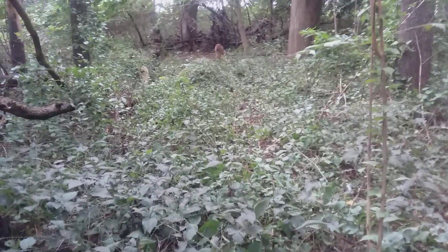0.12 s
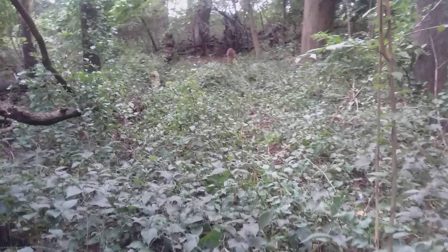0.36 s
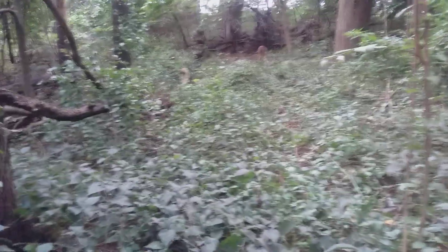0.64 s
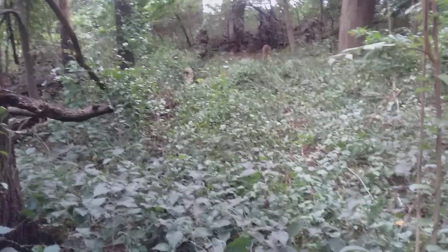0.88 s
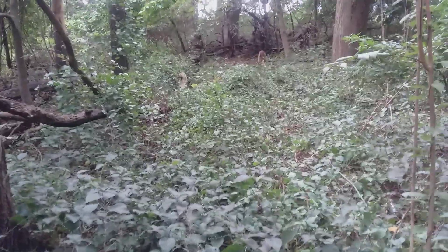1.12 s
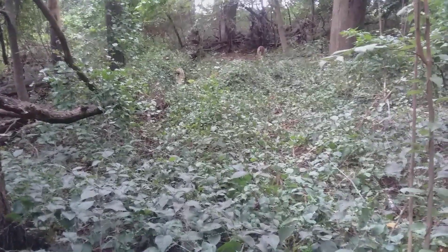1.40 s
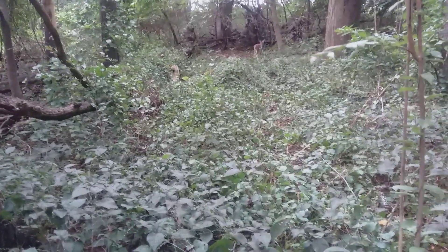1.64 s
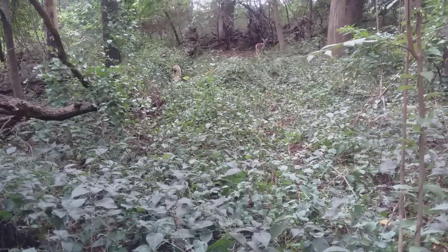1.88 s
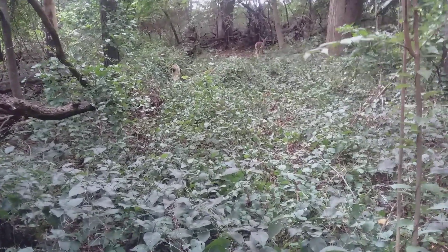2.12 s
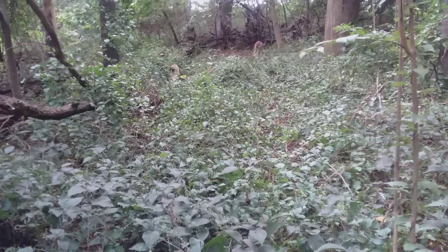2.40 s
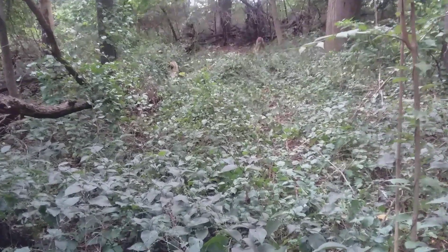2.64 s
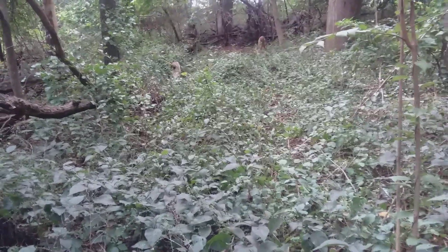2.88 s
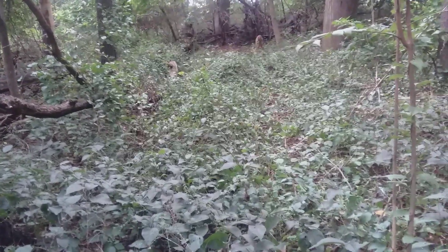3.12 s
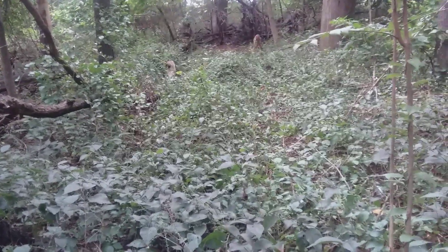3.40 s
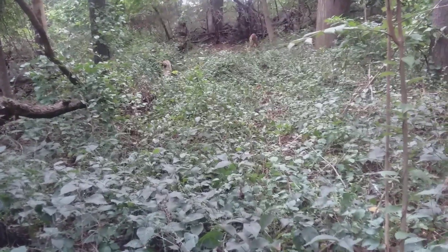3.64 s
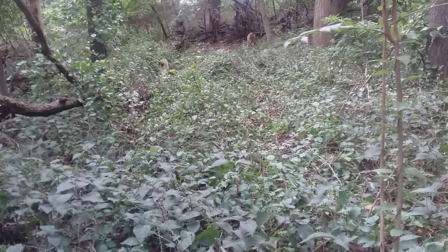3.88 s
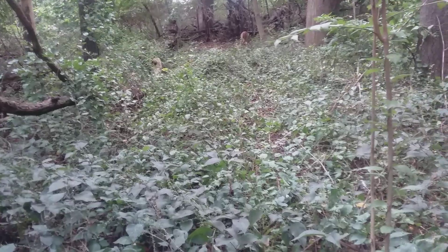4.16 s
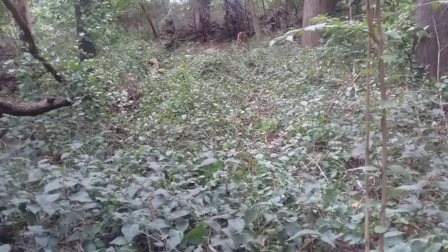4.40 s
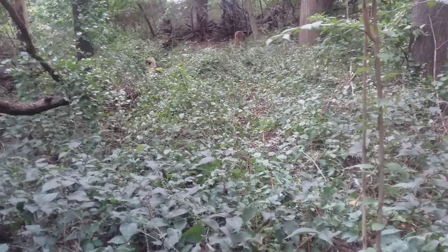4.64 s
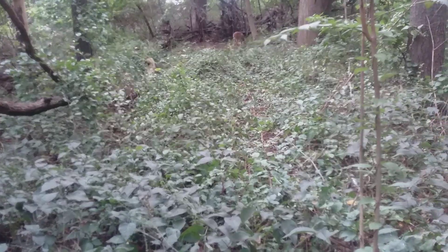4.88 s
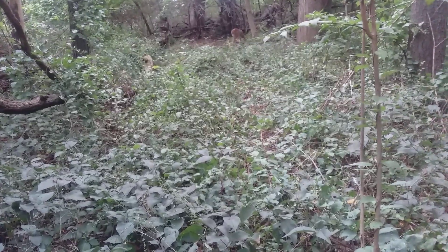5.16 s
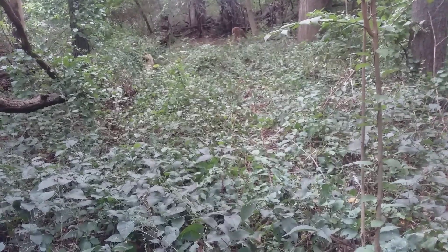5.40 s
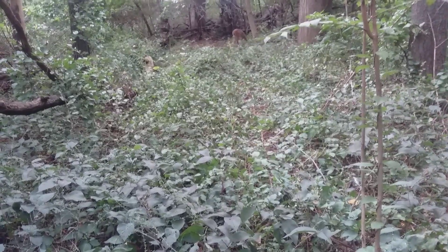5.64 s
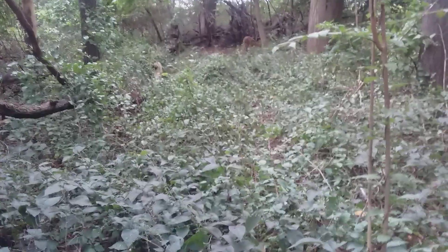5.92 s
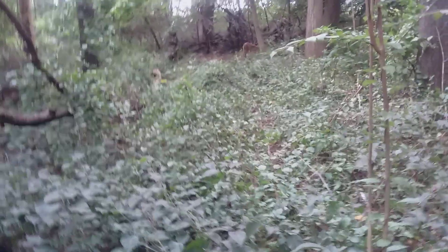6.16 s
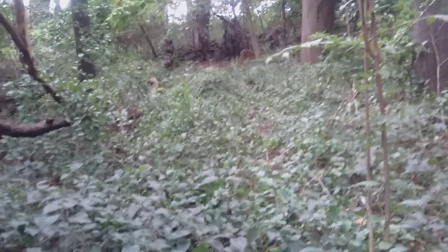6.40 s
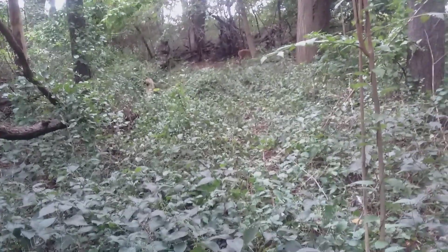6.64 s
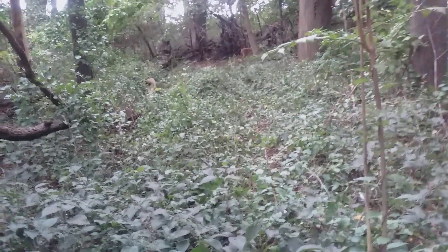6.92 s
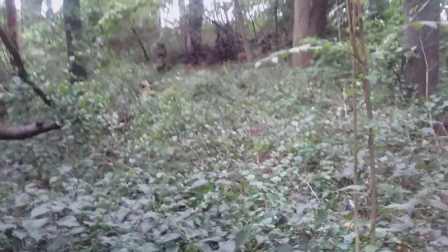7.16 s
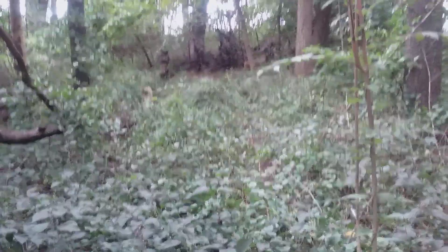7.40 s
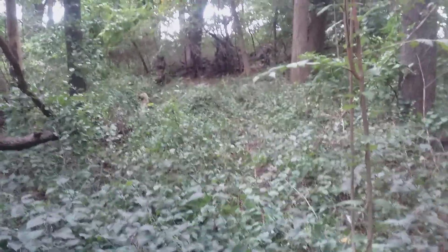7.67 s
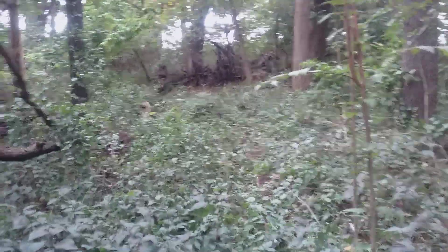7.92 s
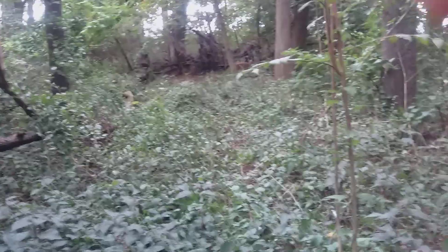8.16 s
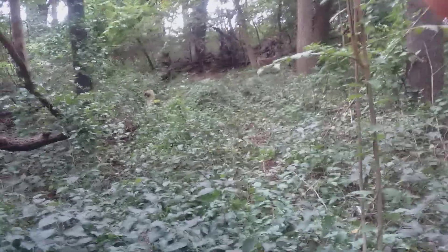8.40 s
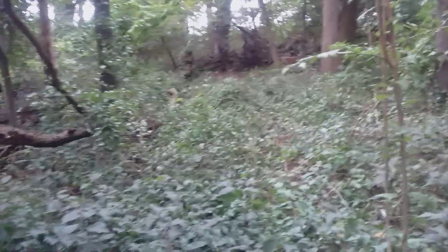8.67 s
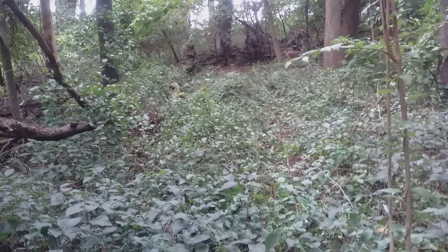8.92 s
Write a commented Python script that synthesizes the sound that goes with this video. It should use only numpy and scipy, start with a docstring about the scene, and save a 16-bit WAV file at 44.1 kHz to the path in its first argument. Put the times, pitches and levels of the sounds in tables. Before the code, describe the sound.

In leafy woodland, a dense chorus of crickets shimmers continuously, very high and pulsing, over soft distant traffic rumble. A handheld microphone picks up small ticks, taps and brief rubs. Just after six seconds a very loud knock thuds, the insects dull as a finger covers the microphone, then scratchy rubbing clears them again, followed by one sharp loud click near eight seconds.

```python
"""In a wood, crickets sing in a dense chorus, with fast trillers and one near chirper, over far traffic rumble.
A hand holds a small camera: fingers tick and rub on the case, knock it hard, cover the microphone and let go.
The insects are pulsed tones, the rubs and the background are mostly coloured noise, and blows on the case
are short ringing tones. A low hum and faint far calls lie behind."""
import sys
import numpy as np
from scipy import signal
from scipy.fft import rfft, irfft
from scipy.io import wavfile

SR = 44100
rng = np.random.default_rng(int(sys.argv[2]) if len(sys.argv) > 2 else 0)


def wav_out(sig):
    """Save sig, one row per channel (or a flat mono array), as 16-bit PCM at SR to the path in sys.argv[1]."""
    wavfile.write(sys.argv[1], SR, np.round(np.clip(np.atleast_2d(sig).T, -1, 1) * 32767).astype(np.int16))


def to_linear_factor(level_db):
    """Convert decibel levels (scalar or array-like) to linear amplitude factors."""
    exponent = np.asarray(level_db, float) / 20
    return 10 ** exponent


N = 398663  # length [samples]
T = np.arange(N) / SR  # time [s]


def curves(tables, rest_db=None):
    """Join table columns by straight lines; with rest_db each table drops to that level outside its span."""
    rows = []
    for table in tables:
        if rest_db is None:
            rows += list(table)
        else:
            quiet = [rest_db] * (len(table[0]) - 1)
            rows += [(table[0][0] - 0.003, *quiet), *table, (table[-1][0] + 0.004, *quiet)]
    times, *columns = np.transpose(rows)
    return [np.interp(T, times, column) for column in columns]


def unit(x):
    """Scale to an rms of 1."""
    return x / np.sqrt(np.mean(x ** 2))


def noise(points, band_hz=(0, SR)):
    """Noise coloured by (frequency [Hz], level [dB]) points, with rms 1 inside band_hz."""
    hz, db = np.transpose(points)
    f = np.arange(1, N // 2 + 2) * SR / N
    gain = to_linear_factor(np.interp(np.log(f), np.log(hz), db, -99, -99))
    in_band = (f > band_hz[0]) & (f < band_hz[1])
    share = np.sum(gain[in_band] ** 2) / np.sum(gain ** 2)
    coloured = irfft(rfft(rng.standard_normal(N)) * gain, N)
    return unit(coloured) / np.sqrt(share)


def walk(rate):
    """Random levels, rate of them a second, joined by smooth steps; their spread is near 1."""
    place = T * rate
    k = place.astype(int)
    level = 1.15 * rng.standard_normal(k[-1] + 2)
    part = place - k
    return level[k] + np.diff(level)[k] * part * part * (3 - 2 * part)


def tone(hz):
    """Phase of a tone whose pitch may move."""
    return 2 * np.pi * np.cumsum(hz * np.ones(N)) / SR


def from_stroke(cycles):
    """Place within each wing cycle, from -0.5 to 0.5, with 0 at the middle of the stroke."""
    return (cycles + 0.5) % 1 - 0.5


def strokes(cycles, share):
    """Loudness of one smooth wing stroke a cycle, filling this share of it."""
    return np.cos(np.pi * np.clip(from_stroke(cycles) / share, -0.5, 0.5))


def with_octave(phase, octave_db):
    """A wing tone and its octave."""
    return np.sin(phase) + to_linear_factor(octave_db) * np.sin(2 * phase)


def leaves(x, t60=0.39567, wet_db=-5):
    """Trunks and leaves scatter the song into a short smear that fades by 60 dB in t60 [s]."""
    t = T[:int(t60 * SR)]
    tail = rng.standard_normal(len(t)) * to_linear_factor(-60 * t / t60)
    tail = tail / np.sqrt(np.sum(tail ** 2))
    return unit(x + to_linear_factor(wet_db) * signal.fftconvolve(x, tail)[:N])


def crickets(voices, octave_db, count, scatter=0.02):
    """Several singers a voice, each with its own pitch and beat; the pitch sags through each stroke."""
    out = 0
    for hz, spread_hz, db, rate, share in voices:
        chances = rng.standard_normal((count, 2))
        for pitch, (tempo, start) in zip(np.linspace(-1.3, 1.3, count), chances):
            cycles = rate * (1 + scatter * tempo) * T + 3 * start
            sagging_hz = hz * (1 - 0.028 * from_stroke(cycles))
            phase = tone(sagging_hz + spread_hz * (pitch + 1.3 * walk(90)))
            loudness = to_linear_factor(db + 1.5 * walk(3)) * strokes(cycles, share)
            out = out + loudness * with_octave(phase, octave_db)
    return out


# The near cricket's count: (time [s], chirps sung so far [count])
CHIRP_COUNT = [(0, .42), (4.5, 60.24), (7.7, 102.99), (9.04, 120.85)]
# Its main tone and split octave: (pitch [Hz], relative level [dB])
CHIRP_TONES = [(6650, 2.5), (13250, 2), (13730, -2.5)]
# How they stand out of the chorus: (time [s], main level [dB], octave level [dB])
CHIRP_LEVELS = [(0, -5, -22), (4.3, -4.5, -21), (7.5, -4, -24), (8.3, 5, -22), (8.75, 4.5, -22),
                (9.04, -3.5, -22)]


def near_cricket():
    """Short chirps on a steady beat, each a little different, the pitch sagging through the stroke."""
    cycles, = curves([CHIRP_COUNT])
    main_db, octave_db = curves([CHIRP_LEVELS])
    bend = (1 - 0.03 * from_stroke(cycles)) * (1 + 0.006 * walk(14))
    tones = []
    for hz, db in CHIRP_TONES:
        phase = tone(hz * bend * (1 + 0.0045 * walk(3.5)))
        tones.append(to_linear_factor(db + 2.2 * walk(17)) * np.sin(phase))
    main, *octave = tones
    return (to_linear_factor(main_db) * main + to_linear_factor(octave_db) * sum(octave)) * strokes(cycles, 0.36)


# Thin steady tones: (pitch [Hz], level next to the chorus [dB])
WHINE_TONES = [(14000, -29.5), (15000, -48.5)]


def whine():
    """Very high, thin, steady sine tones."""
    return sum(np.sqrt(2) * to_linear_factor(db) * np.sin(tone(hz)) for hz, db in WHINE_TONES)


# (wing pitch [Hz], pitch spread scale [Hz], relative level [dB], pulses [per s], share of the cycle sung [0-1])
CHORUS_VOICES = [(6260, 20, -9, 45, 0.28), (6516, 77, -6, 27, 0.4), (6713, 80, 0.5, 13.4, 0.3),
                 (6870, 90, -3.5, 28, 0.64), (7200, 100, -8.5, 55, 0.25), (7370, 88, -14.5, 60, 0.54),
                 (7800, 15, -22.5, 84, .7), (3470, 110, -28, 30, 0.55), (10830, 70, -37, 60, .6)]


def chorus():
    """Dense wing song smeared by the wood, with the near cricket and the whine in it."""
    crowd = leaves(crickets(CHORUS_VOICES, octave_db=-34.5, count=5))
    return to_linear_factor(-51.5) * unit(crowd + near_cricket() + whine())


# (wing pitch [Hz], pitch spread scale [Hz], relative level [dB], pulses [per s], share of the cycle sung [0-1])
TRILL_VOICES = [(5480, 35, -3.5, 88, .45), (5578.1, 73, -4, 47, 0.61), (5900, 110, -6, 81, 0.57)]
# (time [s], level [dB])
TRILL_LEVEL = [(0, -67), (1.8, -71), (6.2, -69.5), (7.3, -63), (7.9, -62.5), (9.04, -66)]


def trillers():
    """Fast wing pulses in three voices; singers within a voice beat at nearly the same rate."""
    song = leaves(crickets(TRILL_VOICES, octave_db=-15, count=3, scatter=0.0037))
    return to_linear_factor(curves([TRILL_LEVEL])[0]) * song


# One close triller: (time [s], level [dB])
NEAR_TRILL_LEVEL = [(0, -84.5), (3, -77), (6.3, -76.5), (6.8, -83), (7.2, -76.5), (7.5, -61.5), (7.9, -63),
                    (8.5, -67), (9.04, -67.5)]


def near_triller():
    """Fast even pulses, each sweeping down through the wing's range, slightly smeared."""
    hz, pulses_per_s, sweep = 5350, 97, 0.25  # sweep: part of the pitch lost over a whole cycle
    cycles = pulses_per_s * T + 0.3 * walk(2.3)
    phase = tone(hz * (1 - sweep * from_stroke(cycles) + 0.015 * walk(30)))
    song = strokes(cycles, 0.46) * to_linear_factor(2.5 * walk(40)) * with_octave(phase, octave_db=-15)
    return to_linear_factor(curves([NEAR_TRILL_LEVEL])[0]) * leaves(song, t60=0.1, wet_db=-7.5)


def friction(rubs, swell):
    """Two loudness curves: each rub swells to its peak (shaped by a power), then fades; powers add."""
    power = np.zeros((2, N))
    for s, swell_s, fade_s, *db in rubs:
        on = slice(max(int((s - swell_s) * SR), 0), int((s + 3 * fade_s) * SR))
        rise = np.clip(1 + (T[on] - s) / swell_s, 0, 1) ** swell
        fall = to_linear_factor(-22 * np.clip(T[on] - s, 0, 1) / fade_s)  # 22 dB lost in each fade time
        power[:, on] += np.outer(to_linear_factor(np.array(db)), rise * fall) ** 2
    return np.sqrt(power)


# Bright slides of skin: (peak time [s], swell [s], fade [s], hiss level [dB], sizzle level [dB])
SLIDE_RUBS = [(.086, 0.02758, 0.1393, -60.5, -70), (1.146, .025, 0.2018, -59, -64.5),
              (1.31, 0.0194, 0.25, -68.5, -74), (1.53, 0.01044, .12, -67.5, -69),
              (2.578, .02, .12, -74, -74.5), (3.88, 0.05453, 0.138, -65.5, -67.5),
              (6.13, .006, .13, -66, -63), (6.3, .004, 0.097, -53.5, -50), (6.447, 0.014, 0.0907, -62, -63),
              (6.628, 0.087, .15, -67, -62), (7.0, .15, .3, -59, -57), (7.092, 0.086, 0.014, -56, -53),
              (7.11, 0.0039, 0.073, -78, -73), (7.321, .12, 0.0665, -66, -67),
              (7.43, 0.1, .012, -57.5, -55.5), (7.45, .005, 0.1263, -63, -61),
              (7.523, .005, 0.01, -50, -58), (7.535, .003, 0.036, -64, -65),
              (7.631, 0.0472, .3, -57.5, -59), (7.811, 0.14, 0.1898, -54, -53),
              (8.164, .002, .2, -67.5, -65), (8.444, .01, .09, -73, -79)]
# Dull catches and drags: (peak time [s], swell [s], fade [s], drag level [dB], scuff level [dB])
DRAG_RUBS = [(.06, 0.04, 0.1506, -66, -73), (1.146, 0.052, 0.241, -66.5, -71),
             (1.31, .025, 0.1312, -69, -84), (3.87, 0.0681, 0.14, -59.5, -68),
             (6.31, 0.0096, 0.19, -59, -68.5), (6.42, .02, .05, -71, -84), (7.09, 0.081, 0.0215, -90, -70),
             (7.405, 0.068, 0.061, -54.5, -51), (7.43, .03, 0.0087, -54, -51),
             (7.448, 0.00376, 0.12, -55.5, -60.5), (7.52, 0.0026, 0.12, -53.5, -70),
             (7.631, 0.1048, 0.1279, -59, -68.5), (7.811, 0.10173, .1, -55.5, -65),
             (8.165, .002, .15, -64, -64.5)]
# Colours of the four rubbing sounds: (frequency [Hz], relative level per Hz [dB])
HISS_COLOUR = [(3800, -36.5), (5000, -7.5), (8500, -1.5), (10500, -2.5), (12500, -18.5)]
SIZZLE_COLOUR = [(9500, -25), (11500, -0.5), (13000, -1), (16000, -7)]
DRAG_COLOUR = [(120, -31.5), (250, 2.5), (700, -2), (2200, -6), (3000, -31.5)]
SCUFF_COLOUR = [(1500, -29.5), (2800, -7.5), (4500, -2.5), (7000, 0.5), (9000, -25)]


def rubbing():
    """Skin hisses, scuffs and drags on the case: bands of noise broken into uneven grains."""
    hiss, sizzle = friction(SLIDE_RUBS, swell=0.4)
    drag, scuff = friction(DRAG_RUBS, swell=1.3)
    rub = hiss * noise(HISS_COLOUR, (8200, 11000)) + sizzle * noise(SIZZLE_COLOUR, (11500, 15500))
    rub = rub + drag * noise(DRAG_COLOUR, (300, 2400)) + scuff * noise(SCUFF_COLOUR, (2500, 4700))
    return rub * to_linear_factor(2.2 * walk(400))


# The hard knock: (time [s], scrape level [dB], body level [dB])
KNOCK_LEVELS = [(6.236, -63, -66), (6.255, -27.5, -28), (6.262, -25, -18), (6.268, -35.5, -17.5),
                (6.2695, -34.5, -8.5), (6.281, -40, -9), (6.285, -36.5, -26), (6.293, -48, -44),
                (6.42, -85.5, -78.5)]
# Colours of its scrape and body: (frequency [Hz], relative level per Hz [dB])
SCRAPE_COLOUR = [(1470, -35), (2500, -5.5), (4310, -1.5), (4910, -10), (6110, 4.5), (9150, -13),
                 (11900, -12), (16000, -12.5)]
BODY_COLOUR = [(59, -31.5), (100, -4), (724, -2), (1060, -6.5), (1400, -3), (1880, -14.5), (2180, -7.5),
               (3440, -19.5), (4700, -23), (8000, -48.5), (10400, -76), (17600, -120)]


def knock():
    """One knock shakes the whole body: a rough scrape and a deeper burst of noise."""
    scrape_db, body_db = curves([KNOCK_LEVELS], -110)
    scrape = to_linear_factor(scrape_db + 4.4 * walk(400)) * noise(SCRAPE_COLOUR)
    return scrape + to_linear_factor(body_db) * noise(BODY_COLOUR)


def thud():
    """The case swings on after the knock, fading and slowing."""
    start_s, hz, start_db, t60_s = 6.2835, 95.5, -19, 0.1274
    fall = 14  # pitch is divided by 1 + fall * time
    t = np.clip(T - start_s, 0, None)
    return to_linear_factor(start_db - 60 * t / t60_s) * np.sin(2 * np.pi * hz * np.log1p(fall * t) / fall)


def add(out, s, blow):
    """Mix a blow in at s [s]."""
    start = int(s * SR)
    out[start:start + len(blow)] += blow


def ring(modes, chances, rise_s):
    """One blow on a set of ringing tones, varied by chance; the contact takes rise_s [s]; peak 1."""
    t = T[:4096]
    y = 0
    for (hz, db, t60), chance in zip(modes, chances):
        loudness = to_linear_factor(db + 2 * chance - 60 * t / t60)
        y = y + loudness * np.sin(2 * np.pi * hz * (1 + 0.044 * chance) * t + chance)
    y = y * np.sin(np.pi / 2 * np.clip(t / rise_s, 0, 1)) ** 4
    return y / np.abs(y).max()


# Ticks of the case: (time [s], peak level [dB])
CASE_TICKS = [(0.0877, -47), (0.614, -47), (0.7944, -59), (0.82, -43), (1.0243, -53), (1.1474, -45),
              (6.1315, -54), (6.2874, -24), (6.4384, -53.5), (6.556, -46), (7.5183, -36), (7.5877, -46),
              (7.7064, -49.5), (7.7303, -50), (8.1614, -9), (8.3513, -35), (8.675, -40), (8.7934, -48.5)]
# Ringing of the plastic: (pitch [Hz], relative level [dB], time to fade 60 dB [s])
PLASTIC_MODES = [(2312, -24, .003), (3610, -16, 0.0029), (4300, -18, 0.0015), (5004, -13.5, .0025),
                 (6400, -8.5, .0025), (7900, -8.5, 0.0025), (9100, -2.5, 0.0023), (11100, -3, .002),
                 (12600, 2.5, 0.0017), (14000, -4.5, 0.0017), (15300, 2, 0.0019)]


def ticks():
    """Bright snaps of the plastic, each a quick blow on its many high ringing tones."""
    out = np.zeros(N + 4096)
    for s, db in CASE_TICKS:
        chances = rng.standard_normal(len(PLASTIC_MODES))
        add(out, s, to_linear_factor(db) * ring(PLASTIC_MODES, chances, 0.0012))
    return out[:N]


# Dull taps on the case, and two heavy blows of the hard knock: (time [s], peak level [dB], pitch [Hz])
CASE_TAPS = [(.055, -51.5, 1200), (.885, -51, 1090), (1.295, -46.5, 1510), (1.605, -50, 900),
             (1.98, -51, 600), (2.002, -43.5, 567), (3.861, -41.5, 600), (3.877, -46, 600),
             (3.907, -50, 4800), (3.944, -41, 720), (4.759, -51, 2013), (5.057, -52, 2000),
             (5.429, -54.5, 1880), (5.75, -52, 760), (6.269, -6, 630.1), (6.2775, -5, 327.6),
             (7.519, -44, 1003), (7.519, -40.5, 110), (7.531, -36, 900), (7.588, -43, 1390),
             (7.706, -39.5, 140), (7.73, -38, 147.9), (7.785, -52, 900)]
# Ringing of a tap or blow: (multiple of its pitch [ratio], relative level [dB], time to fade 60 dB [cycles])
DULL_MODES = [(.6, -3.5, 2.9), (1, -1, 6.5), (1.5, -7.5, 6.4), (2.3, -9.5, 6.5)]


def taps():
    """Dull taps on the case, and two heavy blows of the hard knock, each ringing around its own pitch."""
    out = np.zeros(N + 4096)
    for s, db, hz in CASE_TAPS:
        modes = [(k * hz, mode_db, cycles / (k * hz)) for k, mode_db, cycles in DULL_MODES]
        chances = rng.standard_normal(len(DULL_MODES))
        add(out, s, to_linear_factor(db) * ring(modes, chances, 0.42 / hz))
    return out[:N]


# The case sticks and lets go: (time [s], peak level [dB], length scale [s])
CASE_SNAPS = [(1.192, -49, 0.00051), (1.299, -46, 0.00049), (6.2634, -8, 0.0002), (7.4025, -31, 0.0002),
              (7.4105, -35, 0.00033), (7.4450, -27, 0.00011), (7.518, -35, 0.00025),
              (7.5344, -32, 0.0001604), (8.162, -38, 0.00046), (8.676, -46, .0004)]


def snaps():
    """The case lets go in one short inward push and a weaker rebound."""
    out = np.zeros(N)
    for s, db, length_s in CASE_SNAPS:
        u = T[:256] / length_s - 2
        push = -np.exp(-(2 * u) ** 2)
        rebound = 0.45 * np.exp(-(u - 1.6) ** 2)
        add(out, s - 2 * length_s, to_linear_factor(db) * (push + rebound))
    return out


def hand():
    """All that the hand does to the case: friction noise, a knock and ringing blows."""
    return rubbing() + knock() + thud() + ticks() + taps() + snaps()


# A finger closes over the microphone and lifts off: (time [s], level change [dB])
COVER_LEVEL = [(0, 0.5), (6.28, 0.5), (6.45, -4), (6.61, -7), (6.8, -11.5), (7.33, -15), (7.46, -1.5),
               (9.04, -0.5)]


def cover(share=1):
    """Gain left by the covering finger; share is the part of the level change that a sound takes."""
    return to_linear_factor(share * curves([COVER_LEVEL])[0])


# The level of the low engine hum, rising and dipping unevenly: (time [s], level [dB])
HUM_LEVEL = [(0, -51), (.86, -49.5), (1.88, -42), (2.3, -61.5), (2.45, -47.5), (3.4, -48), (4.11, -50),
             (5.1, -46), (5.55, -42.5), (5.9, -48), (7.65, -54), (8.0, -48), (9.04, -47)]


def engine_hum():
    """The hum of far engines: a wavering low tone, a rough band of noise round it and a faint higher drone."""
    hz, width_hz, rough = 72.416, 14.052, 0.27
    band = noise([(hz - width_hz, -14), (hz, 0), (hz + width_hz, -14)])
    smooth = np.sqrt(2) * np.sin(tone(hz + 2.3 * walk(8.1)))
    hum = unit((1 - rough) * smooth + rough * band)
    drone = to_linear_factor(-32 + 4 * walk(4)) * np.sin(tone(262 + 4 * walk(8)))
    return to_linear_factor(curves([HUM_LEVEL])[0] + 2.5 * walk(11)) * (hum + drone)


# (frequency [Hz], relative level per Hz [dB])
RUMBLE_COLOUR = [(25, -33), (40, -13.5), (55, -1), (70, 0.5), (95, 0), (125, -1.5), (170, -9.5),
                 (220, -21.5), (320, -28.5), (420, -60)]


def traffic_rumble():
    """Far traffic as steady, deep noise."""
    return to_linear_factor(-55) * noise(RUMBLE_COLOUR, (95, 200))


# Two faint far calls, each a list of (time [s], pitch [Hz], level [dB])
FAR_CALLS = [
    [(2.6, 611, -77), (2.7, 619, -60), (2.8, 583, -71.5)],
    [(8.78, 3350, -81.5), (8.82, 3300, -76), (8.92, 3125, -78), (9.0, 3041, -76), (9.04, 3020, -67)],
]


def far_calls():
    """Soft whistles, hoarse because pitch and level shake quickly."""
    hz, = curves([[row[:2] for call in FAR_CALLS for row in call]])
    db, = curves([[row[::2] for row in call] for call in FAR_CALLS], -120)
    return to_linear_factor(db + 4 * walk(60)) * np.sin(tone(hz + 70 * walk(130)))


# (frequency [Hz], relative level per Hz [dB])
AIR_COLOUR = [(120, -29), (200, -4.5), (400, -12), (700, -13.5), (1000, -17.5), (2850, -27.5), (4500, -30),
              (9000, -27), (12000, -30.5), (16000, -34.5)]


def air():
    """The soft wash of the open air: noise whose level wavers slightly."""
    return to_linear_factor(-68.5 + 0.48 * walk(9)) * noise(AIR_COLOUR, (300, 2800))


# (frequency [Hz], relative level per Hz [dB])
CIRCUIT_COLOUR = [(1500, -10.5), (4000, -3.5), (16000, 2.5)]


def circuit_hiss():
    """Steady, bright noise of the circuit."""
    return to_linear_factor(-76.5) * noise(CIRCUIT_COLOUR)


def scene():
    """Insects, hand and background at one microphone; the finger's cover acts on each layer differently."""
    insects = cover() * (chorus() + trillers()) + near_triller()
    low = cover(0.68) * engine_hum() + cover(0.98) * traffic_rumble()
    return (insects + hand() + low + far_calls() + cover(0.93) * air())[None]


def top_cut(x):
    """Nothing passes above the cut-off."""
    return signal.sosfilt(signal.butter(12, 17130, fs=SR, output="sos"), x)


def record(dry):
    """The deepest bass is cut, circuit hiss is added and the loudest peaks are rounded."""
    low_cut = signal.butter(2, 28, "high", fs=SR, output="sos")  # 28 Hz
    heard = signal.sosfilt(low_cut, dry) + circuit_hiss()
    mix = 1.364 * np.tanh(heard / 1.437)
    return top_cut(mix)


dry = scene()
out = record(dry)
wav_out(out)
```